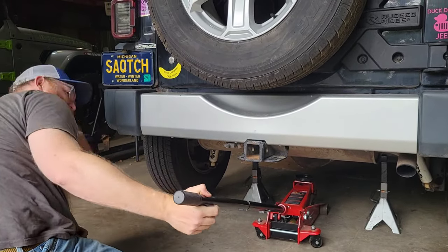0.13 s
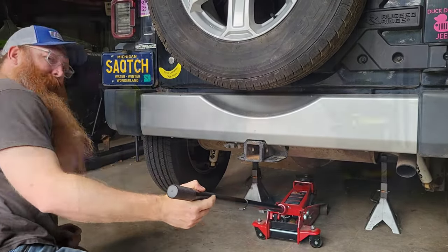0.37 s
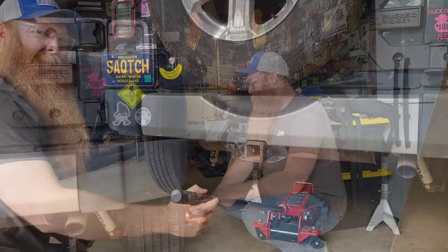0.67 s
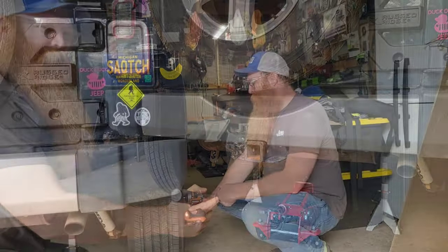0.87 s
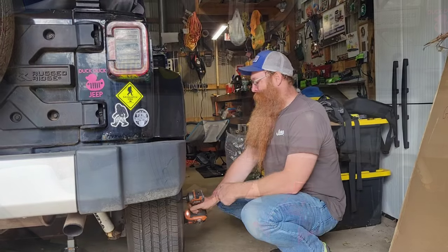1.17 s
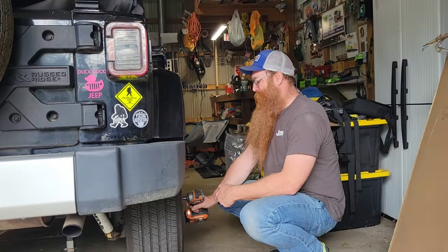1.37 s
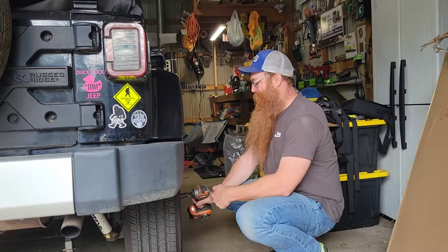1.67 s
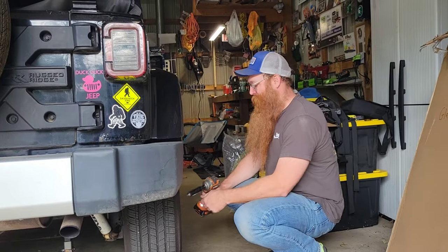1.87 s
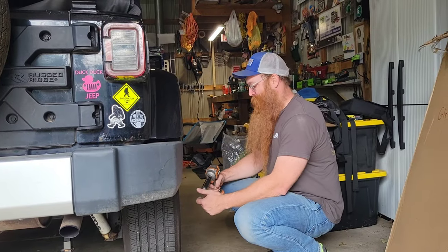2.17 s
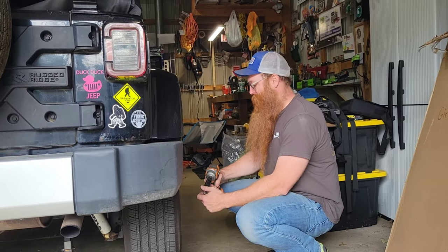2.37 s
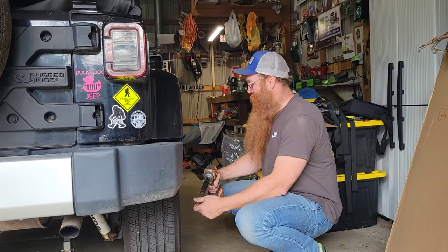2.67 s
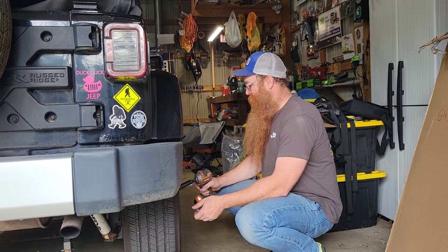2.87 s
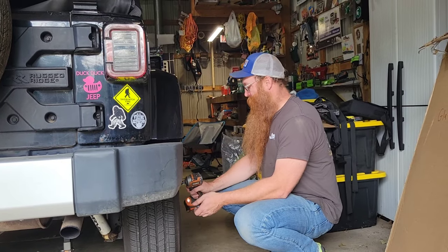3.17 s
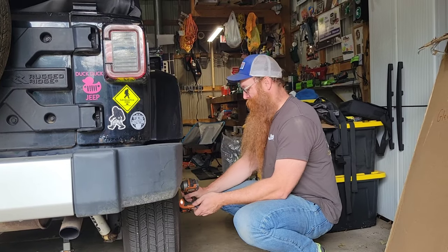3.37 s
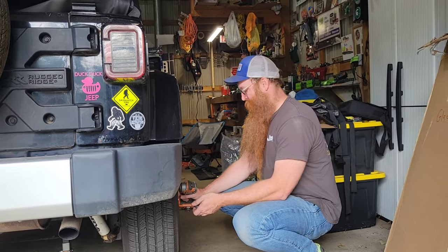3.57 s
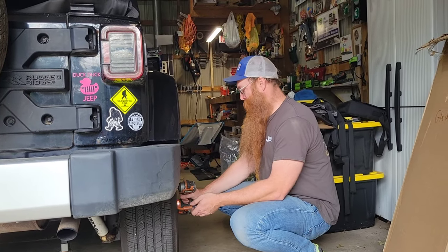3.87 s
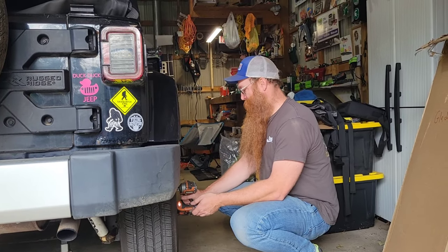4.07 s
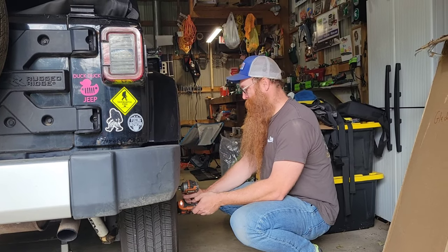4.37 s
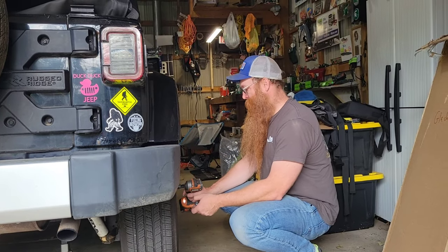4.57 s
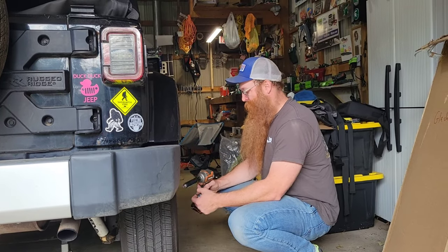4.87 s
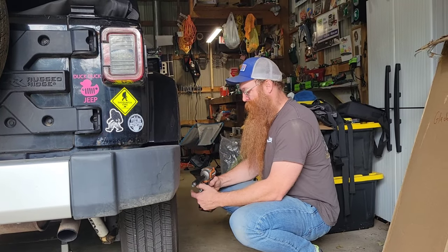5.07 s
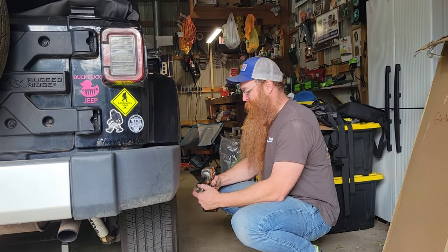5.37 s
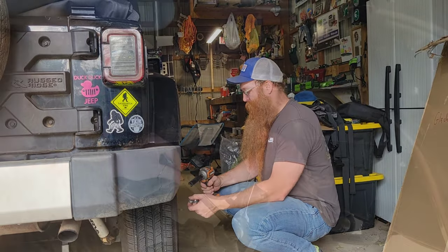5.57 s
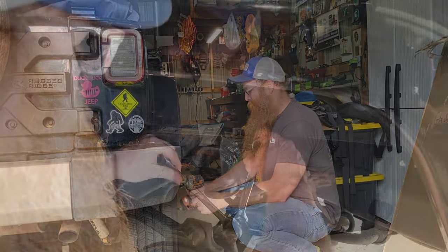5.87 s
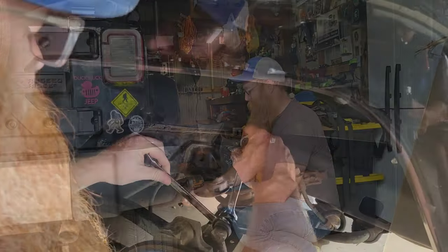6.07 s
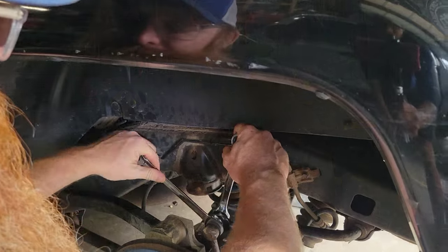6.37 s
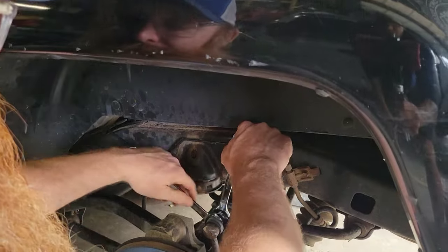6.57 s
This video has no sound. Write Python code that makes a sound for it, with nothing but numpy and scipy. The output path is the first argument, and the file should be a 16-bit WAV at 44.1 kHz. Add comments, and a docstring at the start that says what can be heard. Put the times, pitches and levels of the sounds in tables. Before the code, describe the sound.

From 0 to 0.8 s it is very quiet: low background air, faint hum, distant crickets and slight clicks, ending in a soft low thump. A blink of silence follows. At 0.87 s the garage cuts in abruptly: an impact wrench winds up and strikes about nine hard, rapid metallic blows until 1.02, then whirs freely with gritty gear noise and whine, released at 1.54 and coasting down. Clicks at 1.85, a thin squeak around 2.3 and a small ping at 2.8 follow over wavering low engine idle and crickets on the right. Knocks and hollow clacks come at 3.3-3.6. A second, rattling run lasts 4.0-4.6, braking quickly with a jolt. Scrapes and high nut pings occupy 5.4-5.75. At 5.97 it cuts to near quiet; a close heavy steel clunk bounces at 6.24, with a light tick at 6.38 and faint crickets.

```python
"""Crickets chirp over a low, faintly humming background under a car, with slight clicks and a soft thump.
After a blink of silence an impact wrench in a garage breaks a lug nut loose with a few hammer blows and spins
it off in two runs: noise bursts excite metal modes, and gear noise and whine follow the speed of the shaft.
The socket squeaks, knocks and scrapes, the nut pings and an engine idles outside, as a few wavering low lines.
Back under the car a tool clunks on the suspension: short contact forces ringing in heavy steel."""
import sys
import numpy as np
from scipy import signal
from scipy.fft import rfft, irfft, next_fast_len
from scipy.io import wavfile

SR = 44100
rng = np.random.default_rng(int(sys.argv[2]) if len(sys.argv) > 2 else 0)


def to_wav(s):
    """Save 16-bit WAV."""
    ch = np.atleast_2d(s).T  # columns
    pcm = np.round(np.clip(ch, -1, 1) * 32767)  # PCM
    wavfile.write(sys.argv[1], SR, pcm.astype(np.int16))


N = 296793
T = np.arange(N) / SR
# the first scene ends in silence; the wrench scene then starts and ends abruptly (s)
SILENCE_S, WRENCH_IN_S, WRENCH_OUT_S = .823, .866, 5.967


def undb(db):
    """Amplitude ratio of a level in dB."""
    return 10 ** (np.asarray(db) / 20)


def unit(x):
    """Scale to rms 1."""
    return x / np.sqrt(np.mean(x ** 2))


def on_log(hz, points):
    """Read (Hz, value) points on a log-frequency axis."""
    f, value = np.transpose(points)
    return np.interp(np.log(np.maximum(hz, 1)), np.log(f), value)


def fade(s, db):
    """Gain along a dB curve, silent outside it."""
    return undb(np.interp(T, s, db)) * (T >= s[0]) * (T <= s[-1])


def walk(rate):
    """Smooth chance with spread near 1, drawn anew rate times a second."""
    knots = np.arange(0, T[-1] + 1, 1 / rate)
    return np.interp(T, knots, rng.standard_normal(len(knots)))


def pan(db):
    """Left and right gains for a level difference, left minus right."""
    return undb(np.array([[db], [-db]]) / 2)


def conv(x, response):
    """Pass a sound through an impulse response."""
    return signal.oaconvolve(np.atleast_2d(x), np.atleast_2d(response), axes=-1)[:, :N]


def body(points, size=2048):
    """Causal, minimum-phase response of unit energy with the given spectrum."""
    log_spectrum = np.log(undb(on_log(np.fft.rfftfreq(size, 1 / SR), points)))
    cepstrum = irfft(log_spectrum)
    # folding the cepstrum forward in time gives minimum phase
    cepstrum[1:size // 2] *= 2
    cepstrum[size // 2 + 1:] = 0
    return unit(irfft(np.exp(rfft(cepstrum)))) / np.sqrt(size)


def ring(modes, size=8192):
    """Response of unit energy of (Hz, width Hz, dB) modes: decaying sines, wide modes dying sooner."""
    t = T[:size]
    waves = 0
    for hz, width, db in modes:
        decay = np.exp(-np.pi * width * t)
        waves = waves + undb(db) * width * decay * np.sin(2 * np.pi * (hz * t + rng.random()))
    return unit(waves) / np.sqrt(size)


def diffuse(size, apart_hz):
    """Frequencies and spectra of a diffuse field at two ports: alike in the bass, unrelated in the treble."""
    hz = np.fft.rfftfreq(size, 1 / SR)
    mid, side = rfft(rng.standard_normal((2, size)))
    alike = .97 / (1 + (hz / apart_hz) ** 2)
    return hz, mid * np.sqrt(1 + alike) + side * np.sqrt(1 - alike) * np.array([[1], [-1]])


def garage(x, direct_db, lag_samples=8, size=32768):
    """Direct sound, reaching the right lag_samples late, and a dense room tail that decays by band."""
    # Each row: frequency in Hz, reverberation time T60 in s.
    room_t60 = [(100, 0.33), (1000, 0.34), (4000, 0.36), (15000, 0.17)]
    hz, field = diffuse(size, apart_hz=800)
    centres = np.geomspace(100, 16000, 8)
    tail = 0
    for centre, pick in zip(centres, np.eye(len(centres))):
        band = irfft(field * np.interp(hz, centres, pick))
        tail = tail + band * np.exp(-np.log(1000) * T[:size] / on_log(centre, room_t60))
    onset = np.minimum(T[:size] / 0.0029, 1)
    response = unit(tail * onset) / np.sqrt(size)
    response[[0, 1], [0, lag_samples]] += undb(direct_db)
    return conv(x, response / np.sqrt(1 + undb(2 * direct_db)))


def shaken(x, direct_db, size=3):
    """The sound wanders between several sets of echoes, as from a jolting tool that keeps changing its place."""
    shares = np.array([walk(40) for _ in range(size)])
    shares = shares / np.sqrt(np.sum(shares ** 2, axis=0))
    echoes = sum(garage(x * share, direct_db=-60) for share in shares)
    direct = np.vstack([x, np.roll(x, 8, axis=-1)])  # right port 8 samples late
    return (echoes + undb(direct_db) * direct) / np.sqrt(1 + undb(2 * direct_db))


def ports(x, size=512):
    """Each microphone port colours the sound from the wheel in its own way."""
    # Each row: frequency in Hz, left minus right in dB.
    port_lean = [(60, 1), (400, -3), (700, 0), (1300, -6.5), (2400, -5), (4400, -13.5), (6000, -1.5),
                 (8100, 10), (11000, -1.5), (15000, -4.5)]
    lean = on_log(np.fft.rfftfreq(size, 1 / SR), port_lean) * np.array([[1], [-1]]) / 2
    response = np.fft.fftshift(irfft(undb(lean)), axes=-1)
    return signal.oaconvolve(x, response, mode="same", axes=-1)


def grit(spread_db):
    """Dense tiny contacts: noise whose size jumps every 32 samples."""
    sizes = np.repeat(rng.standard_normal(N // 32 + 1), 32)[:N]
    return unit(rng.standard_normal(N) * undb(spread_db * sizes))


def strikes(rows, length=.002, split_hz=3000, push=0, size=8192):
    """Contact forces: each a clean push and a fading chatter, each with its own share of treble."""
    out = np.zeros(N + size)
    lowpass = signal.butter(1, split_hz, fs=SR, output="sos")
    for s, db, treble_db, *own in rows:
        decay_s = own[0] if own else length
        chatter = rng.standard_normal(size) * np.exp(-T[:size] / decay_s)
        chatter[0] += push * np.linalg.norm(chatter)
        force = chatter / np.hypot(1, push)
        soft = signal.sosfilt(lowpass, force)
        start = int(s * SR)
        out[start:start + size] += undb(db) * (soft + undb(treble_db) * (force - soft))
    return out[:N]


def air(points, db, pan_db):
    """Steady outdoor background through the open door: shaped diffuse noise, its lean easing above 4500 Hz."""
    hz, field = diffuse(next_fast_len(N + 1, True) * 2, apart_hz=800)
    lean = pan_db * np.array([[1], [-1]]) / 2 * on_log(hz, [(4500, 0.83), (8000, 0.067)])
    noise = irfft(field * undb(on_log(hz, points) + lean))[:, :N]
    return unit(noise) * undb(db + .8 * walk(4))


def hum(hz=156, db=-61, octave_db=-65):
    """A faint hum: a sine of slightly wavering level with its steady octave."""
    tone = undb(db + 2 * walk(6.6)) * np.sin(2 * np.pi * hz * T)
    return tone + undb(octave_db) * np.sin(4 * np.pi * hz * T)


def stridulate(rows, start_hz=5150, fall_hz=650, length=0.023, hz_per_db=18, size=2048):
    """Short tones that sag like a slowing cricket wing, or a slowing motor; strong ones start higher."""
    out = np.zeros(N + size)
    for s, db in rows:
        pitch, sag, pace = rng.standard_normal(3) * [35, .15, .09]
        u = np.minimum(T[:size] / (length * np.exp(pace)), 1)  # progress through the tone
        top_hz = start_hz + hz_per_db * max(db + 40.5, 0) + pitch
        hz = top_hz - fall_hz * np.exp(sag) * u ** 1.3
        swell = np.sin(np.pi * u ** 0.54) ** 2
        start = int(s * SR)
        out[start:start + size] += undb(db) * swell * np.sin(2 * np.pi * np.cumsum(hz) / SR)
    return out[:N]


def crickets(far_db=-57, count=130, trill_stroke_s=0.012):
    """Near chirps and motor flares on the right; trills and a chorus from further off, mostly by the walls."""
    # Nearest crickets, and short 5 kHz flares as the motor tone sweeps through a housing resonance.
    # Each row: start in seconds, number of strokes, which stroke is strongest, relative level in dB.
    near_rows = [(.018, 2, 2, -58), (.228, 1, 1, -62), (.366, 3, 3, -59), (.657, 4, 3, -57.5),
                 (1.19, 2, 1, -36.5), (1.578, 1, 1, -39), (1.67, 4, 2, -43.5), (2.097, 2, 2, -46),
                 (2.171, 2, 2, -41), (2.451, 3, 1, -46.5), (2.727, 5, 2, -43.5), (3.114, 2, 2, -37.5),
                 (3.177, 2, 2, -46.5), (3.541, 4, 4, -44.5), (3.871, 3, 2, -42.5), (4.61, 2, 1, -38.5),
                 (4.898, 2, 2, -43), (5.035, 5, 5, -47), (5.431, 2, 2, -46.5), (5.829, 2, 2, -49),
                 (5.85, 2, 2, -50)]
    # Crickets further off. Each row: start in seconds, nominal starting pitch in Hz, relative level in dB.
    trills = [(2.299, 4800, -62), (2.891, 4570, -56.5), (3.32, 4600, -58.5), (3.76, 4620, -52.5),
              (5.32, 4620, -53), (5.976, 5410, -61), (6.27, 5370, -63), (6.49, 5040, -62.5),
              (6.63, 5380, -59.5)]
    stroke_s, accent_db, scatter_db, trill_s = .0405, 5.5, 4, 0.13
    strokes = []
    for start, number, strongest, db in near_rows:
        for k in range(round(number)):
            accent = accent_db * (k + 1 == round(strongest))
            strokes.append((start + k * stroke_s, db + accent + scatter_db * rng.standard_normal()))
    near = garage(undb(2) * stridulate(strokes), direct_db=5.5, lag_samples=12) * pan(db=-13.5)
    far = stridulate([(when * T[-1], far_db - 8 * loud) for when, loud in rng.random((count, 2))])
    for start, hz, db in trills:
        times = np.arange(start, min(start + trill_s, T[-1]), trill_stroke_s)
        far = far + stridulate([(s, db) for s in times], start_hz=hz, fall_hz=390.5)
    return near + garage(far, direct_db=-9) * pan(db=-12.0)


def clicks():
    """Short clicks of steel, with a few soft rustles of handling: coloured bursts, mostly heard by their echoes."""
    # Clicks and rustles. Each row: start in seconds, relative level in dB, treble in dB.
    click_rows = [(.25, -65, 12.5), (.65, -63.5, 15.5), (.794, -47, -1), (1.854, -35, 12),
                  (1.895, -42, 11.5), (1.918, -46, -10), (2.14, -50.5, 4), (2.57, -58, 7.5),
                  (2.805, -53.5, 5), (3.12, -53.5, 4), (4.024, -31, -14.5), (5.404, -35.5, -8)]
    # Their colour. Each row: frequency in Hz, level in dB.
    click_colour = [(200, -30), (500, -3), (1200, -9), (3500, -3.5), (5300, -9), (7000, -14.5),
                    (11000, -15), (13500, -14.5), (16000, -17.5)]
    force = strikes(click_rows, length=0.0021, push=.5)
    return shaken(undb(7.5) * conv(force, body(click_colour)), direct_db=-5)


def bump(start_s=.795, hz=75, db=-24, decay=0.0089):
    """A soft low thump: one quickly decaying sine."""
    t = np.maximum(T - start_s, 0)
    return undb(db) * np.exp(-t / decay) * np.sin(2 * np.pi * hz * t)


def idle(level_db=-1.0, waver_db=1.5):
    """An engine idles some way off, its low lines wavering together and alone."""
    # Each row: time in seconds, mean firing rate in Hz, relative level in dB.
    idle_course = [(1.3, 94, -54.5), (1.45, 92.6, -45.5), (2.47, 94.4, -48.5), (2.56, 89.8, -50),
                   (3.51, 87.47, -47), (5.36, 88.2, -48.5), (5.96, 90.8, -41)]
    # Each row: multiple of half the firing rate, relative level in dB.
    idle_lines = [(1, -4.5), (2, 5), (3, -24), (4, -12)]
    s, hz, db = np.transpose(idle_course)
    turns = np.cumsum(np.interp(T, s, hz) * (1 + 0.015 * walk(20))) / SR / 2
    lines = 0
    for k, line_db in idle_lines:
        lines = lines + undb(line_db + 0.56 * walk(25.0)) * np.sin(2 * np.pi * round(k) * turns)
    return lines * undb(np.interp(T, s, db) + level_db + waver_db * walk(7))


def hammering():
    """The motor winds up and the hammer hits the anvil; housing, socket and wheel ring."""
    # Hammer on anvil. Each row: start in seconds, relative level in dB.
    blows = [(0.895, -24.5), (0.915, -20.5), (0.927, -18), (0.934, -6.5), (0.949, -9), (0.966, -9),
             (0.981, -11.5), (0.991, -5), (1.017, -9)]
    # Colour of the blows. Each row: frequency in Hz, level in dB.
    blow_colour = [(41, -39.5), (70, -15), (96, 4.5), (142, -9), (228, -6), (566, -10), (635, -10),
                   (872, -10), (1540, -5), (1850, -1), (3260, -4), (10900, -18), (13000, -10),
                   (14900, -13.5), (16000, -33)]
    # Modes of socket and wheel. Each row: frequency in Hz, width in Hz, relative level in dB.
    socket_modes = [(2005, 110, -14.5), (3020, 14, 1.5), (3170, 22, 1.5), (4060, 620, -6),
                    (6730, 38, -28.5), (9400, 60, 2.5), (10200, 480, -8.5), (9600, 28, -10.5),
                    (10500, 58, -15.5), (12160, 180, 0), (14200, 99, -12.5), (14700, 170, -6.5)]
    # the wind-up noise rises until the second blow
    wind_up = rng.standard_normal(N) * fade([WRENCH_IN_S, blows[1][0]], [-51, -33.5])
    treble_db = 3.5
    force = strikes([(s, db, treble_db) for s, db in blows], length=0.0037) + wind_up
    wheel = undb(-8) * conv(force, ring(socket_modes))
    return undb(2.0) * conv(force, body(blow_colour)) + wheel


def shaft_motion(start, release, spin_up, coast, top_hz):
    """Speed of the motor shaft in one run, the turns it has made, and how hard it drives the gears."""
    # the motor picks up from a share of its speed and creeps faster as the nut frees
    start_share, creep_hz_per_s = .33, 75
    # gear noise grows as a power of the speed and falls to a soft whirr once the trigger is let go
    gear_power, release_db_per_s, whirr_db = 0.58, 123, -16.5
    running, coasting = np.maximum(T - start, 0), np.maximum(T - release, 0)
    powered = top_hz * (1 - (1 - start_share) * np.exp(-running / spin_up))
    powered = powered + creep_hz_per_s * (running - coasting)
    hz = powered * np.exp(-(coasting / coast) ** 2) * (1 + .0012 * walk(60))
    let_go = undb(np.maximum(-release_db_per_s * coasting, whirr_db))
    drive = (hz / top_hz) ** gear_power * let_go * (T >= start)
    return hz, np.cumsum(hz) / SR, drive


def free_run(run, gear_ratio=11.5, throb=0.2, dull_shift=0.85):
    """Gears churn and the nut rattles, both throbbing once a turn of the socket; the rattle brightens with speed."""
    # Colour of the gears. Each row: frequency in Hz, level in dB.
    gear_colour = [(71, -26), (120, -6.5), (454, -14), (643, -5.5), (874, -10.5), (968, -6.5), (1140, -11),
                   (1340, -9), (2340, -5), (4980, -7), (11500, -14), (13300, -5), (16000, -5.5)]
    # Colour of the nut rattling at speed. Each row: frequency in Hz, level in dB.
    rattle_colour = [(1500, -28.5), (2500, -13), (3100, -8.5), (3600, 0.5), (4400, -9.5), (5000, -1.5),
                     (6000, -35.5), (9000, -42.5)]
    *motion, gear_db, rattle_db, brake_db = run
    release = motion[1]
    shaft_hz, turns, drive = shaft_motion(*motion)
    wobble = 1 + throb * np.sin(2 * np.pi * turns / gear_ratio)
    gears = conv(grit(spread_db=4.5) * wobble, body(gear_colour))
    fast = (shaft_hz / shaft_hz.max()) ** 4
    dull_colour = [(hz * dull_shift, db) for hz, db in rattle_colour]
    dull = conv(grit(spread_db=6) * np.sqrt(1 - fast), body(dull_colour))
    bright = conv(grit(spread_db=5) * np.sqrt(fast), body(rattle_colour))
    # the brake jolts the nut shortly after the trigger is let go
    brake_delay_s, brake_length_s = 0.046, 0.019
    jolt = undb(brake_db) * np.exp(-((T - release - brake_delay_s) / brake_length_s) ** 2)
    churn = gears * (undb(gear_db) * drive + undb(-2.5) * jolt)
    rattle = (dull + bright) * wobble * (undb(rattle_db) * drive + undb(2) * jolt)
    return churn + rattle


def whine(run, speed_power=2):
    """Motor and gear tones beam out of the tool near full speed; each swells as it crosses a housing resonance."""
    # Each row: multiple of the shaft rate, relative level in dB.
    whine_orders = [(2, -17.5), (9, -20), (10, -19), (11, -15), (14, -17), (23, -21), (28, -21)]
    # Resonances of the housing. Each row: frequency in Hz, width in Hz, strength in dB.
    housing = [(4990, 75, 18), (13400, 900, 12)]
    *motion, gear_db, _, _ = run
    shaft_hz, turns, drive = shaft_motion(*motion)
    tones = 0
    for order, db in whine_orders:
        boost = 1
        for hz, width, up_db in housing:
            boost = boost + undb(up_db) / (1 + (2 * (order * shaft_hz - hz) / width) ** 2)
        tones = tones + undb(db + 2.5 * walk(45)) * boost * np.sin(2 * np.pi * order * turns)
    speed = (shaft_hz / shaft_hz.max()) ** speed_power
    return garage(tones * drive * speed * undb(gear_db), direct_db=3, lag_samples=10)


def squeak(waver=0.0033):
    """The socket squeaks thinly as it is turned in the hand: a slightly unsteady tone that swells and fades."""
    # One row: middle in seconds, length in seconds, mean pitch in Hz, relative level in dB.
    squeak_row = (2.34, .24, 3025, -63)
    s, length, hz, db = squeak_row
    swell = np.exp(-(2 * (T - s) / length) ** 2)
    return undb(db) * swell * np.sin(2 * np.pi * np.cumsum(hz * (1 + waver * walk(60))) / SR)


def handling():
    """Socket and nut knock, clack, scrape and ping: contact forces and grit through metal responses."""
    # Socket set on the nut. Each row: start in seconds, relative level in dB, treble in dB, chatter decay in s.
    knock_rows = [(3.272, -46, 2, 0.017), (3.409, -35, 8.5, 0.027), (3.445, -26, -19, 0.013),
                  (3.615, -25, -0.5, 0.016), (3.63, -32, -10, 0.027)]
    # Colour of the knocks. Each row: frequency in Hz, level in dB.
    knock_colour = [(88, -28), (150, 0.5), (309, -2), (871, -6.5), (1100, -6.5), (1900, -7), (2550, -10),
                    (3160, -5.5), (4320, -10), (5050, -7), (6260, -18), (14500, -26.5), (16000, -30)]
    # Hollow clacks as the socket seats. Each row: start in seconds, relative level in dB, treble in dB.
    clack_rows = [(3.411, -29, 5), (3.444, -22, -9), (3.457, -25, -17)]
    # Each row: frequency in Hz, width in Hz, relative level in dB.
    clack_modes = [(723, 43, 1.5), (1240, 140, 0.5), (1550, 160, -5), (1680, 78, 1), (2120, 160, -2)]
    # Pulls that work the nut out of the socket. Each row: peak in seconds, relative level in dB, rise in s.
    pulls = [(5.415, -42, 0.014), (5.53, -40, 0.038), (5.726, -39, 0.017)]
    # Colour of the scrape. Each row: frequency in Hz, level in dB.
    scrape_colour = [(110, -34), (180, -10), (334, -7), (555, -2), (824, -11), (1030, -10.5), (1950, -12.5),
                     (3990, -8), (5000, -12), (5700, -20.5), (12100, -20.5), (16000, -24)]
    # The loose nut pings. Each row: start in seconds, relative level in dB.
    pings = [(2.805, -48), (3.412, -43), (5.58, -55), (5.645, -46), (5.735, -52)]
    # Each row: frequency in Hz, relative level in dB, T60 in s.
    nut_modes = [(8310, -18, .35), (11820, -16, .42), (15430, 0, .55)]
    knocks = undb(-6) * conv(strikes(knock_rows), body(knock_colour))
    clacks = conv(strikes(clack_rows, length=0.003, push=1.6), ring(clack_modes))
    pressure = 0
    for s, db, rise in pulls:
        pressure = pressure + undb(db) * np.exp(-np.maximum((s - T) / rise, (T - s) / 0.058))  # decay 0.058 s
    scrape = conv(grit(spread_db=5.5) * pressure, body(scrape_colour))
    taps = np.zeros(N)
    for s, db in pings:
        taps[int(s * SR)] = undb(db)
    t = T[:SR]
    nut = sum(undb(db - 60 * t / t60) * np.sin(2 * np.pi * hz * t) for hz, db, t60 in nut_modes)
    # the fingers shift on the nut, so its ring wavers
    return knocks + clacks + scrape + conv(taps, nut) * undb(2.1 * walk(50))


def suspension():
    """A tool knocks against heavy steel parts close by, the big knock bouncing twice."""
    # Each row: start in seconds, relative level in dB, treble in dB, chatter decay in s.
    clunks = [(6.07, -52, -14, 0.0087), (6.24, -34.5, 4, 0.0038), (6.243, -23.5, -0.5, 0.003),
              (6.25, -25.5, -23, 0.0071), (6.262, -33, -20, 0.0068), (6.378, -45.5, 13, 0.0084),
              (6.708, -76, 19, 0.012)]
    # Colour of the clunks. Each row: frequency in Hz, level in dB.
    clunk_colour = [(100, -33), (220, -24), (320, -4.5), (450, 9), (600, -10), (800, -3), (1050, -2.5),
                    (1350, -7), (1800, -25.5), (2200, -4.5), (4500, -17), (8400, -9.5), (10500, -23.5),
                    (15000, -12.5)]
    # Modes of the steel. Each row: frequency in Hz, width in Hz, relative level in dB.
    clunk_modes = [(430, 120, 7.5), (800, 160, 7.5), (1330, 93, 7), (1433, 45, 5.5), (1840, 170, 4.5),
                   (2620, 80, -4)]
    force = strikes(clunks, push=1.3)
    steel = undb(1) * conv(force, body(clunk_colour)) + undb(-0.5) * conv(force, ring(clunk_modes))
    return garage(steel, direct_db=3.5, lag_samples=0) * pan(db=-2.5)


def scene():
    """Three scenes in a row, with crickets in each and a moment of silence before the wrench."""
    # Free runs. Each row: start in seconds, trigger let go in seconds, spin-up in s, coasting in s,
    # shaft rate before creep in Hz, then relative levels in dB of gear noise, nut rattle and its braking jolt.
    runs = [(1.017, 1.539, .04, 0.28, 442.1, -31.5, -45.5, -47),
            (4.017, 4.594, .068, .11, 442, -30, -35, -31)]
    # Backgrounds of the three scenes. Each row: frequency in Hz, relative density in dB per Hz.
    air_first = [(15, -35), (25, -17), (70, 4.5), (157, -2.5), (263, -19), (309, -15), (354, -19),
                 (489, -19), (1160, -21.5), (2910, -24), (4250, -25.5), (5000, -23), (5430, -25.5),
                 (13600, -43), (16000, -66)]
    air_main = [(15, -43), (25, -11), (108, -4.5), (263, -23), (309, -33), (591, -27), (936, -28),
                (1290, -24.5), (2480, -33.5), (3080, -29), (3620, -34.5), (4610, -27.5), (5730, -45),
                (12900, -51.5), (16000, -45.5)]
    air_last = [(15, -39), (25, -10), (76, 8), (223, -5), (263, 0.5), (451, -18), (503, -7), (734, -18.5),
                (863, -7.5), (1070, -20), (4030, -26), (4870, -2.5), (5880, -37.5), (7310, -21.5),
                (16000, -42.5)]
    action = hammering() + handling() + squeak() + sum(free_run(run) for run in runs)
    tool = ports(shaken(action, direct_db=-2.5) + sum(whine(run) for run in runs) + clicks())
    first = (air(air_first, db=-52, pan_db=-3.5) + hum() + bump()) * (T < SILENCE_S)
    main = (air(air_main, db=-48.5, pan_db=-6.0) + idle()) * (T >= WRENCH_IN_S)
    last = air(air_last, db=-55.5, pan_db=-1.5) + suspension()
    mix = np.where(T < WRENCH_OUT_S, first + main + tool, last) + crickets()
    return mix * ((T < SILENCE_S) | (T >= WRENCH_IN_S))


def record(dry):
    """The microphone sheds the deepest bass, rounds the highest peaks and cuts the top above 15.7 kHz."""
    lean = signal.sosfilt(signal.butter(2, 30, "high", fs=SR, output="sos"), dry)
    rounded = np.tanh(1.45 * lean) / 1.45
    return signal.sosfilt(signal.ellip(10, .2, 80, 15700, fs=SR, output="sos"), rounded)


dry = scene()
out = record(dry)
to_wav(out)
```